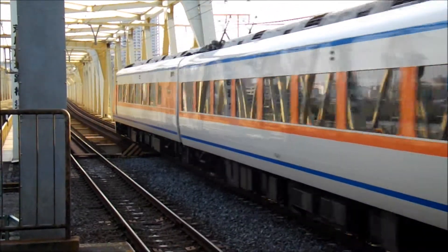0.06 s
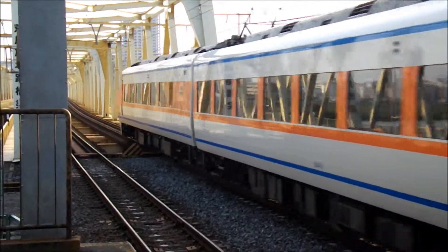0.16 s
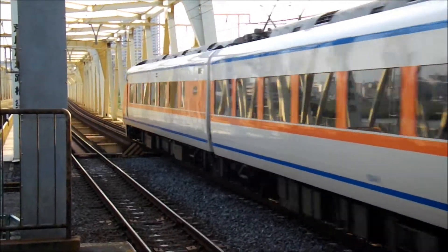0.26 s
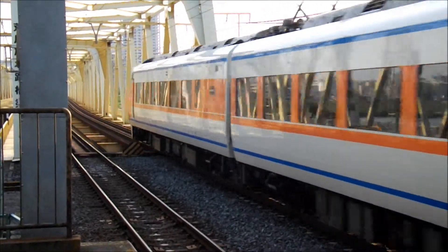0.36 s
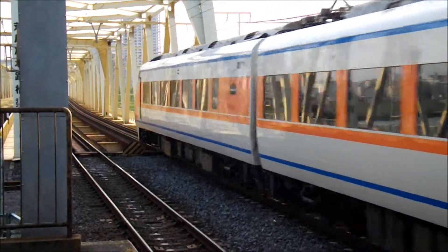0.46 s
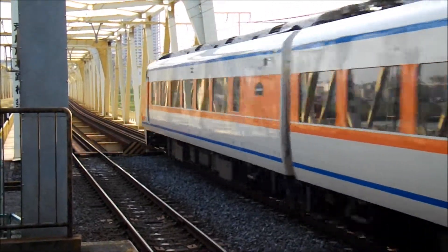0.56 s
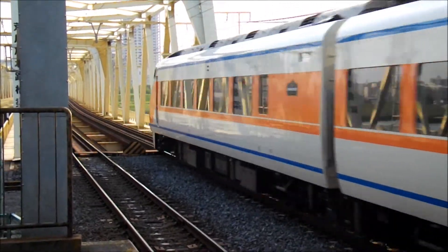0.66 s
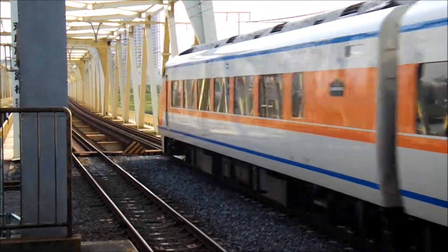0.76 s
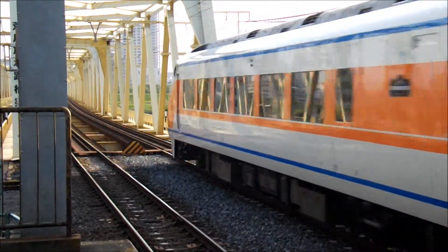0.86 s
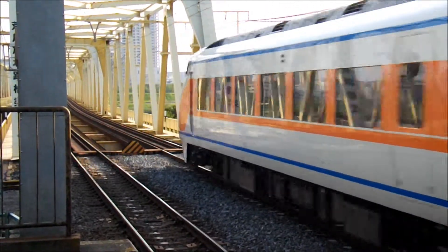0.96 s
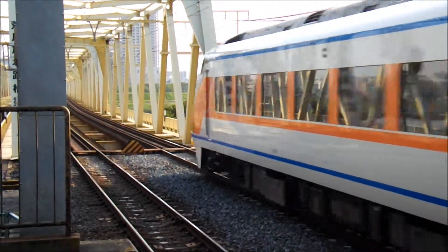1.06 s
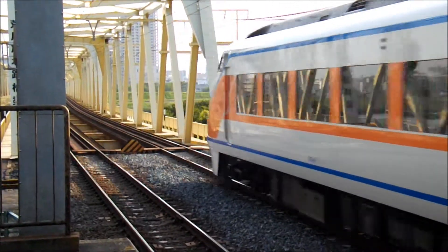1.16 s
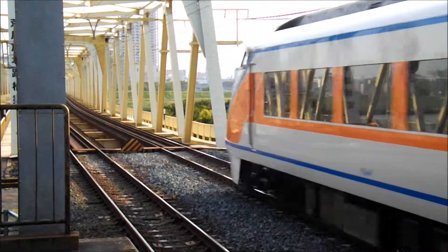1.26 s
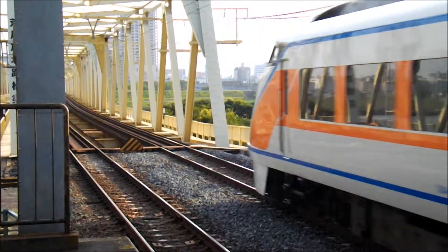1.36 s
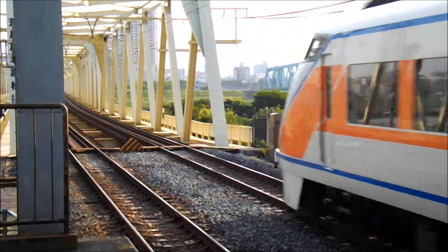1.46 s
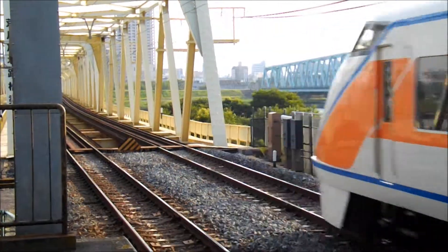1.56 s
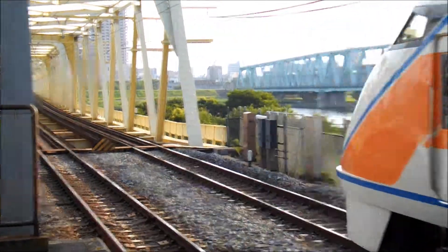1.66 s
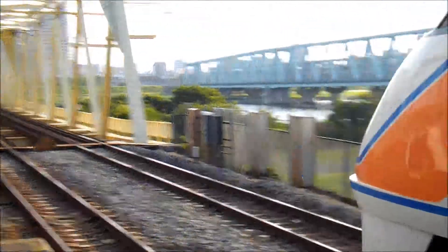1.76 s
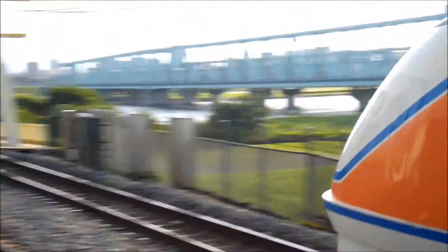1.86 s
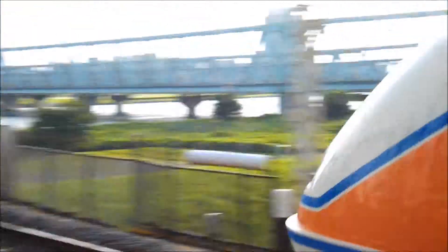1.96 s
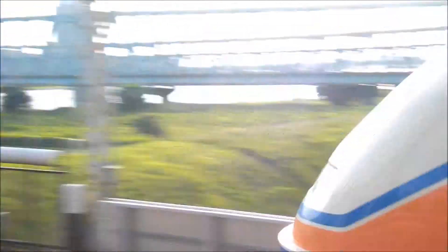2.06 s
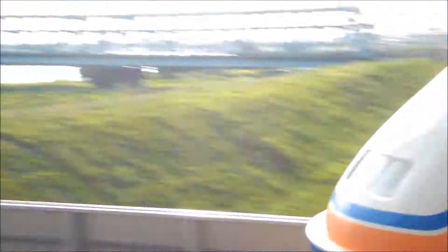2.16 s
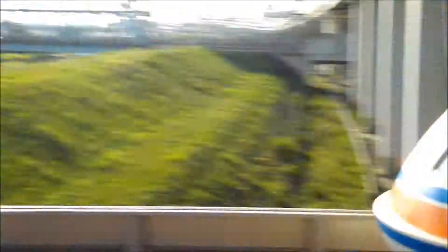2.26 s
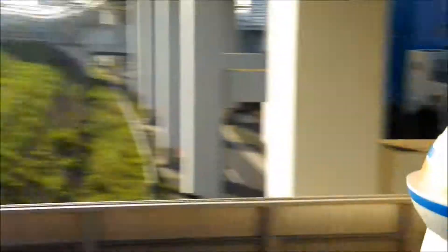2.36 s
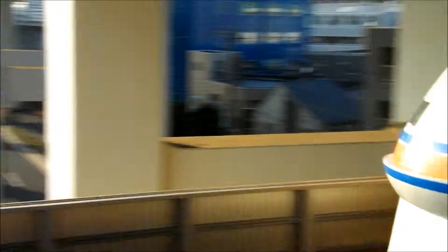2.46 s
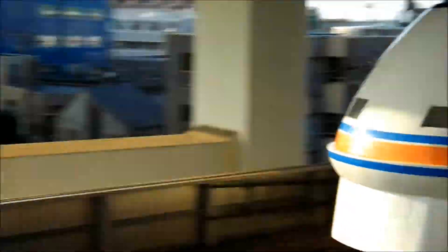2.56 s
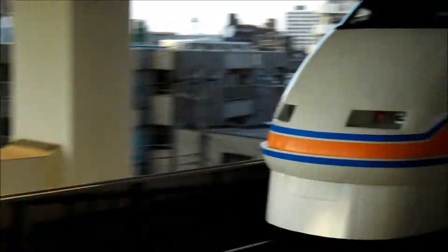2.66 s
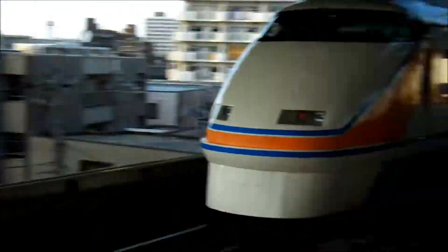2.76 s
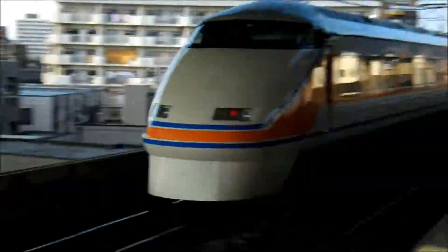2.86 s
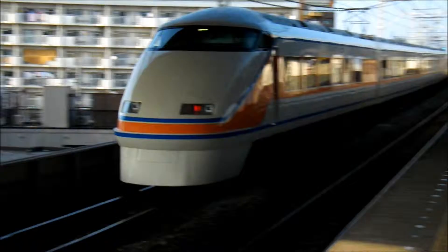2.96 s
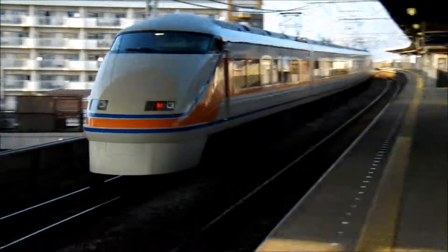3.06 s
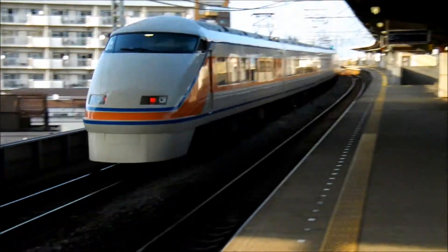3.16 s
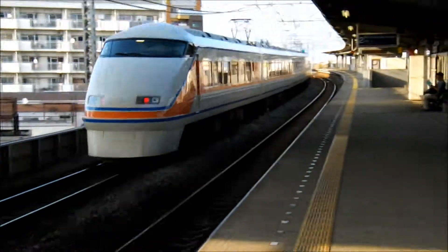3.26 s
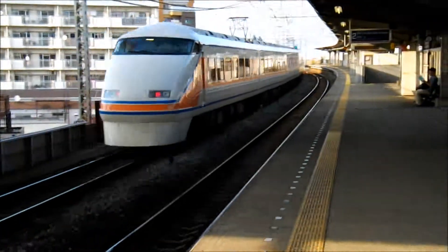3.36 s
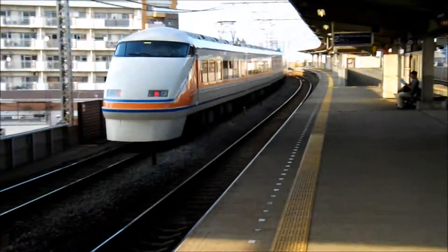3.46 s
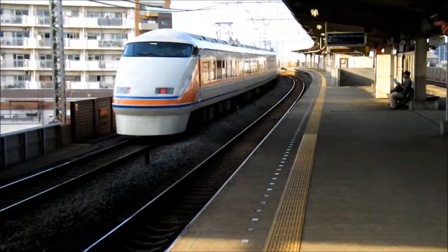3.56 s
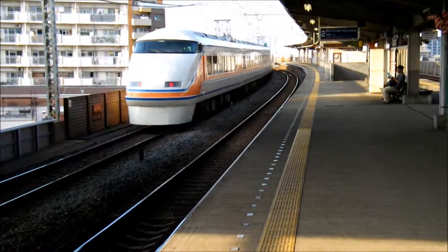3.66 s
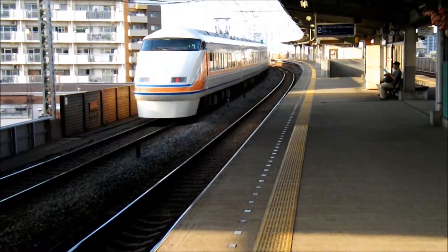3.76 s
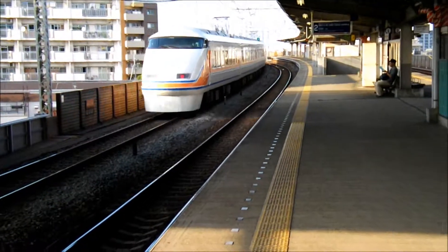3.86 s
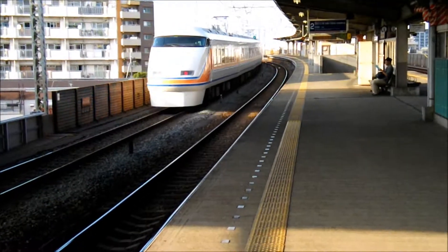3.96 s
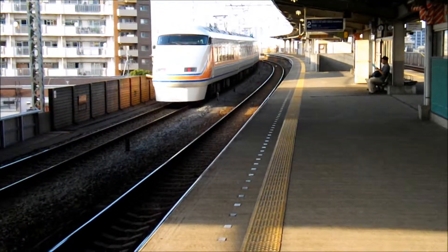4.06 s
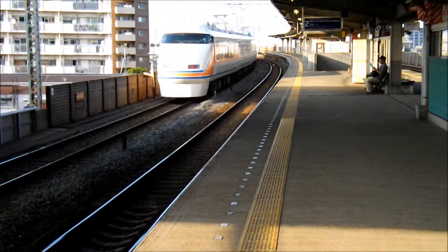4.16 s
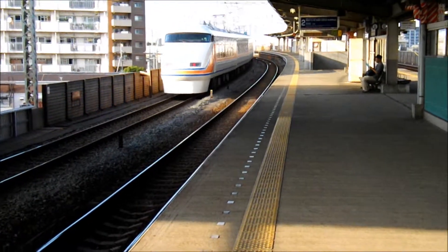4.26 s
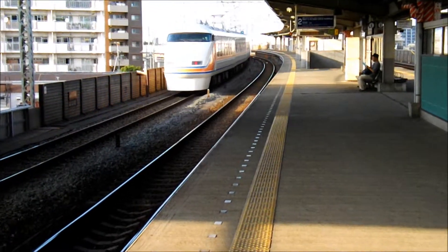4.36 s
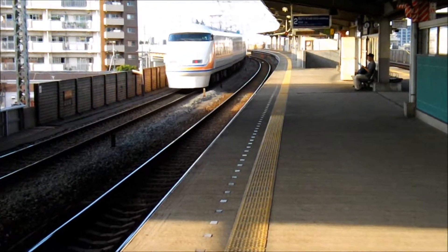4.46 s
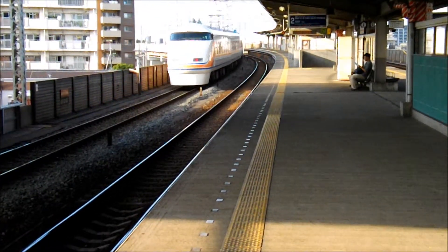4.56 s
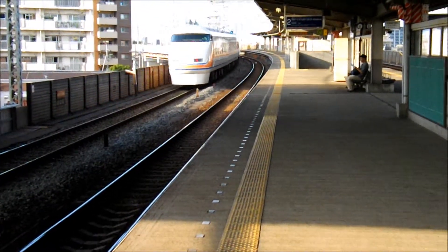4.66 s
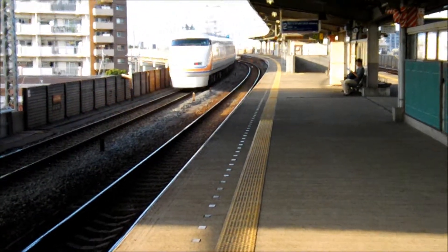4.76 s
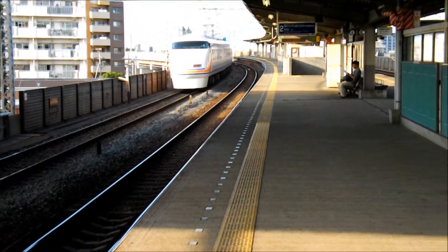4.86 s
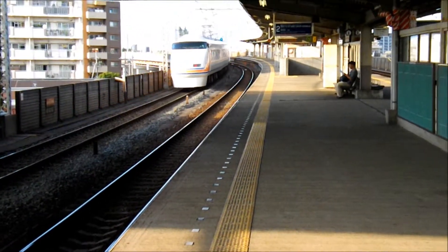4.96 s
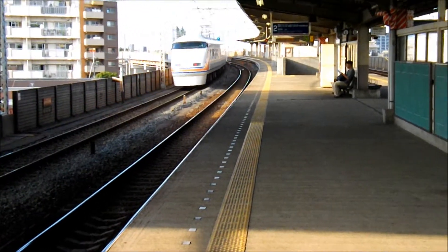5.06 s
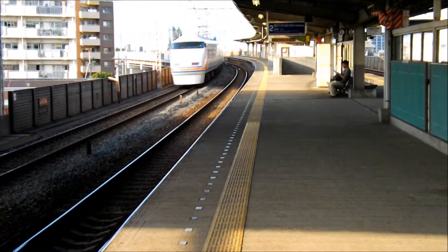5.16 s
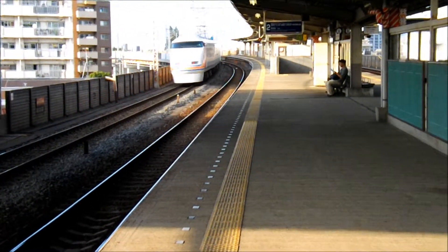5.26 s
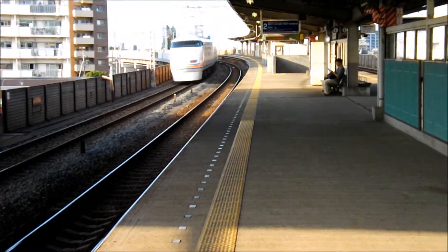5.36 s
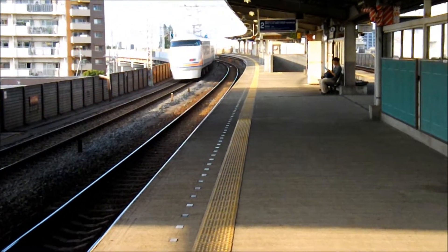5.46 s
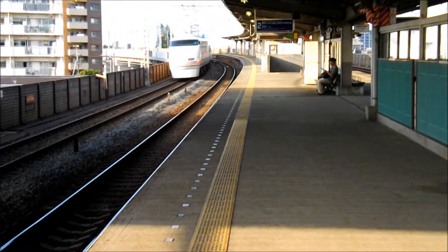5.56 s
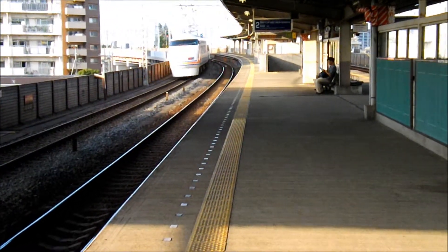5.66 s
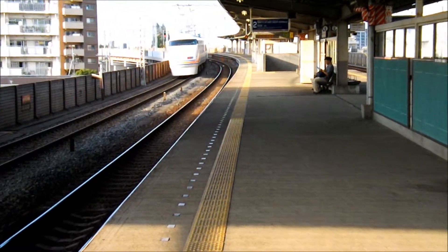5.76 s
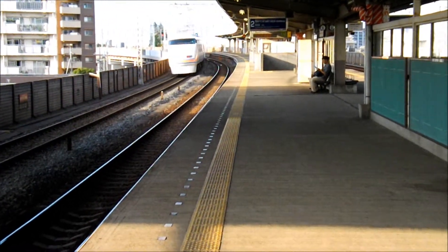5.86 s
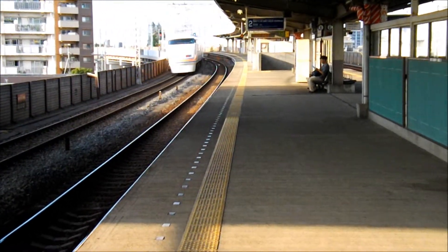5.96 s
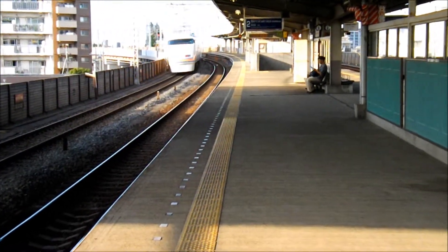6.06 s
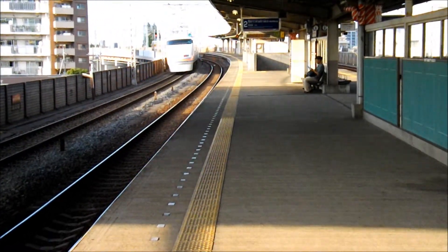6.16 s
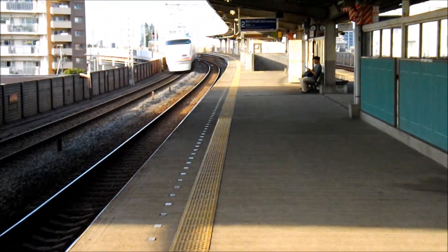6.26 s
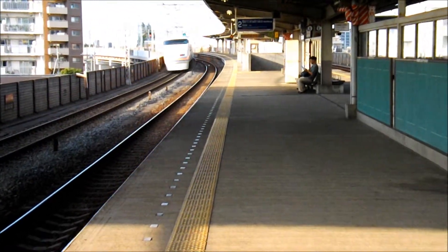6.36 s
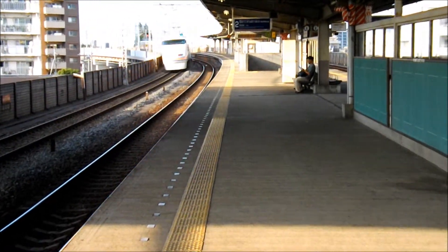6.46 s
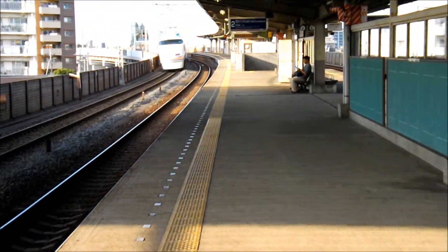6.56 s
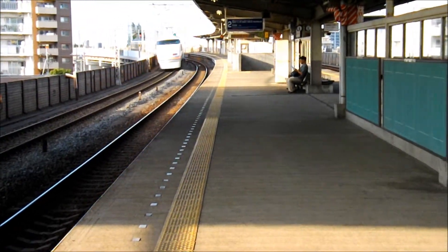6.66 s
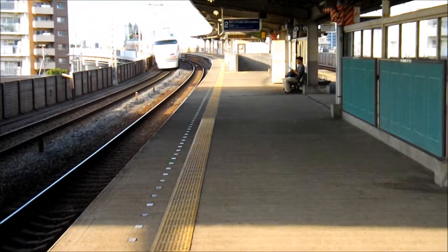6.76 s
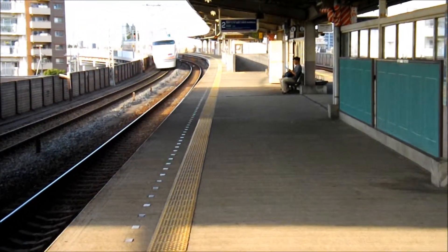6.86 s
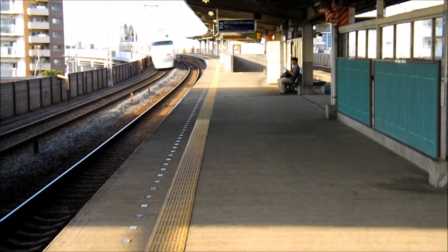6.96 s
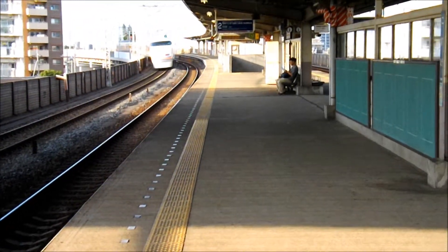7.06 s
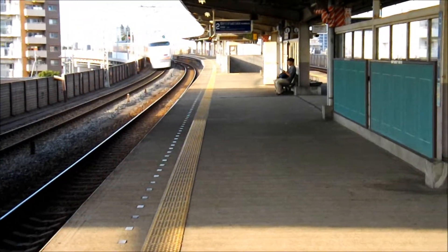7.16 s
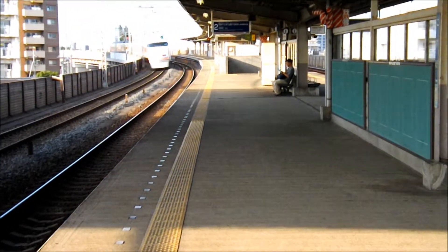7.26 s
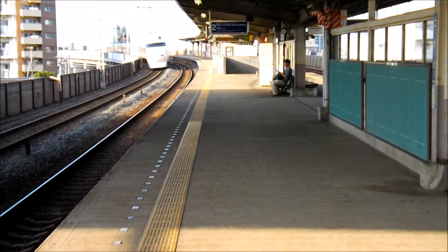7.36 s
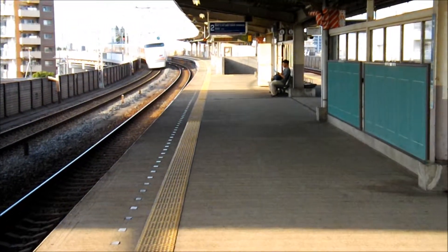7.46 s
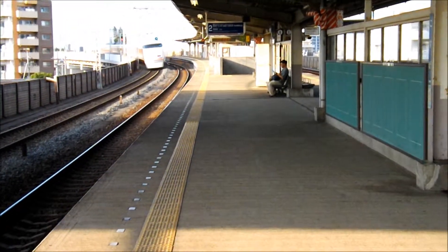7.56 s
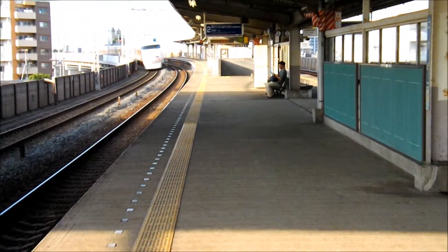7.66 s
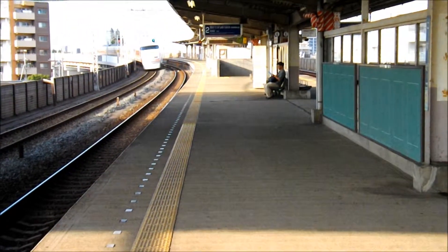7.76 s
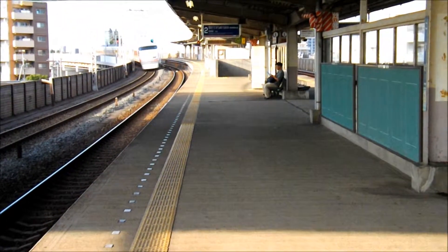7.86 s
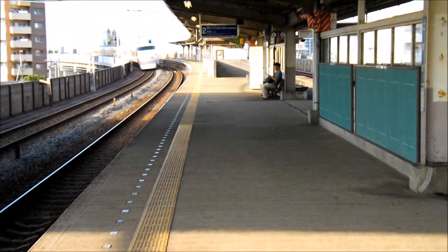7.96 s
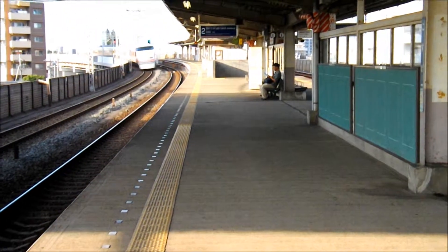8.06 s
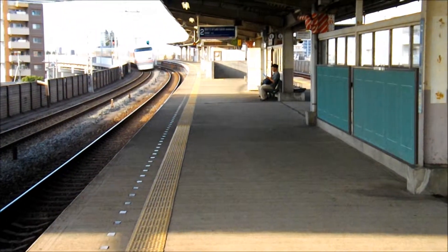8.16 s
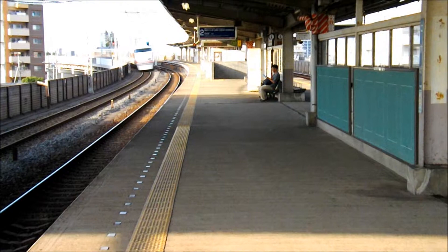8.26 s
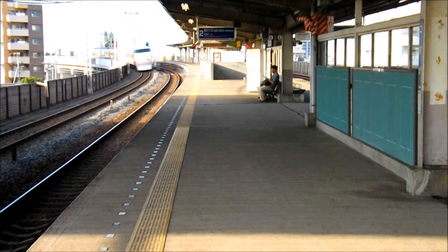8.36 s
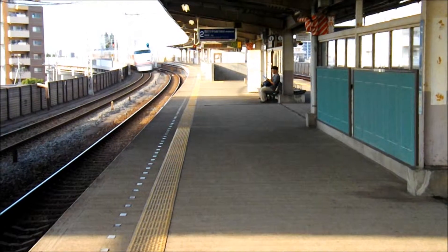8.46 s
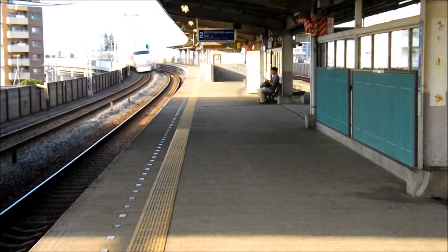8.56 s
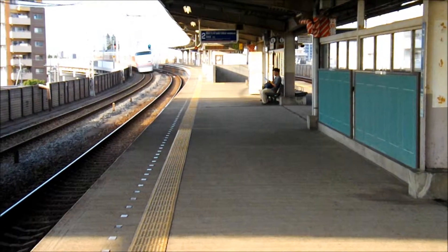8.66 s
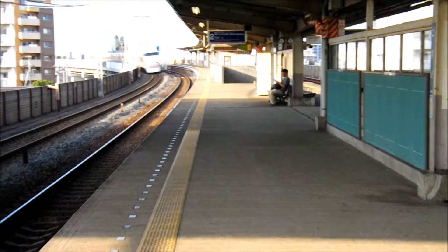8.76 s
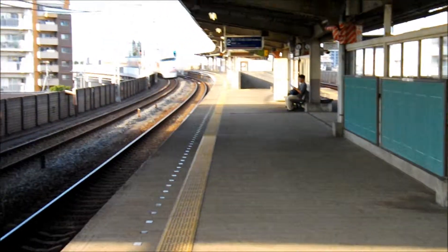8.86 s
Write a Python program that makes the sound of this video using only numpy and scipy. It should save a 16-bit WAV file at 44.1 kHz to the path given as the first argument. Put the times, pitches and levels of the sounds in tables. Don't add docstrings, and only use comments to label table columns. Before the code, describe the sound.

Loud, harsh wheel-on-rail roar sweeps by on a bridge, fades quickly, leaving faint singing rails, distant hiss and wind buffeting the microphone.

```python
import sys
import numpy as np
from scipy import signal
from scipy.fft import rfft, irfft, next_fast_len
from scipy.io import wavfile
from scipy.ndimage import uniform_filter1d, map_coordinates

SR = 44100
rng = np.random.default_rng(int(sys.argv[2]) if len(sys.argv) > 2 else 0)


def to_wav(s):
    ch = np.atleast_2d(s).T
    pcm = np.round(np.clip(ch, -1, 1) * 32767)
    wavfile.write(sys.argv[1], SR, pcm.astype(np.int16))


def decibels_to_gain(level_db):
    exponent = np.asarray(level_db, float) / 20
    return 10 ** exponent


N = 393372

# f/Hz, density level/dB
TRAIN_SPECTRUM = [(120, -48), (165, -15), (200, -8), (370, -4), (776, -0.2), (979, -3.5), (1440, -5),
                  (2800, -1.5), (4060, -1), (5250, -4.5), (5970, -15), (7540, -14), (12000, -36.5),
                  (16000, -78)]
PART_EDGES = [450, 1300, 3850, 5700]
# t/s, nearness level/dB, flange bite level/dB
PASSAGE = [(0, -0.5, 2), (.24, 1, -1), (.57, 0.5, -1.5), (.76, -1, 2.5), (.88, 0, -0.5), (.99, -0.5, 2.5),
           (1.14, -0.5, -0.5), (1.41, -1.5, -1), (1.9, 0, 1), (2, 0, -1.5), (2.54, -4, -0.5),
           (2.72, -5, 2.5), (2.88, -8, 1), (3.6, -16, 1.5), (4, -19, 1.5), (5.2, -25, 2.5), (6, -27, -1.5),
           (8.92, -28, -4.5)]
# level/dB, fading per dB of nearness, share of the bite, patchiness/dB
TRAIN_PARTS = [
    (-30.5, 1, 0.01, -0.1),
    (-24.5, 0.78, 0.01, 1.65),
    (-20, 0.91, 0.01, 1.3),
    (-20, 1.01, 1.57, 1),
    (-34, 0.93, 0.77, 1.1),
]
# middle t/s, duration/s, rise in level/dB
FLANGE_RASPS = [(.47, .15, 1), (1.07, 0.092, -0.5), (3.1, 0.35, 0), (5.95, .15, 3.5), (7.72, 0.091, 4),
                (8.14, 0.11, 6), (8.22, .06, 5), (8.33, 0.078, 7), (8.45, .1, 6), (8.62, .06, 9),
                (8.83, 0.23, 7.5)]
# middle t/s, duration/s, rise in level/dB
BOGIE_THUMPS = [(.1, .15, 0), (.5, 0.13, -0.5), (.99, .06, 1.5), (1.27, 0.48, 1.5), (1.55, 0.18, 0.5),
                (1.91, .1, 1.5), (2.17, 0.079, 0), (2.74, .1, 1.5)]
# t/s, duration/s, level/dB, f/Hz, bandwidth/Hz
FLANGE_SQUEALS = [(0, 0.084, -21, 5150, 200), (0.726, 0.12, -28.5, 6900, 700), (0.918, .09, -24, 5000, 250),
                  (1.792, 0.18, -22.5, 5150, 150), (2.434, 0.11, -27.5, 5000, 200),
                  (2.576, 0.072, -17.5, 5370, 160), (2.58, 0.049, -33, 6870, 70),
                  (2.618, 0.079, -25, 5400, 150), (5.82, 0.083, -40, 4740, 400), (7.7, .07, -44, 4950, 400),
                  (8.36, 0.065, -38, 4600, 600), (8.595, .045, -43, 4300, 700),
                  (8.787, 0.22, -42, 4900, 500)]
# t/s, duration/s, level/dB, f/Hz, bandwidth/Hz
RAIL_RINGS = [(.5, 0.14, -28, 800, 40), (0.687, 0.13, -27, 644, 50), (0.956, 0.077, -24, 1665, 40),
              (1.198, 0.12, -25.5, 780, 60), (1.445, 0.46, -31, 760, 60), (2.597, 0.11, -29, 766, 60),
              (2.986, 0.18, -41, 716, 30), (3.198, .45, -42, 606, 39.7), (3.2, .48, -43.5, 1130, 30),
              (3.749, .48, -50, 1120, 25)]
# f/Hz, density level/dB
TOWN_SPECTRUM = [(110, -15), (190, 0.5), (460, -1), (770, 0.5), (1260, -4), (1910, -7), (2280, -5),
                 (2680, -13.5), (3700, -16), (4100, -2), (5050, -1), (5600, -14.5), (6200, -20),
                 (10000, -50)]
# middle t/s, duration/s, level/dB
PORT_GUSTS = [(3.899, 0.36, -27), (4.08, 0.11, -31), (4.246, 0.27, -22.5), (4.58, 0.26, -32.5),
              (4.803, .03, -31), (4.876, .06, -30.5), (5.227, 0.051, -31), (5.46, .04, -26),
              (5.512, 0.051, -31), (5.587, .04, -34), (5.65, .04, -31.5), (5.733, 0.035, -31),
              (5.797, 0.041, -26.5), (5.895, 0.033, -26), (6.01, 0.058, -28), (6.118, 0.11, -26.5),
              (6.222, .04, -31), (6.285, 0.075, -29), (6.533, 0.14, -33), (7.005, 0.049, -29),
              (7.065, 0.019, -29), (7.329, 0.047, -33), (7.465, 0.07, -32), (7.53, 0.031, -32),
              (7.651, 0.22, -33.5), (7.95, 0.43, -36), (8.265, 0.081, -32), (8.4, 0.22, -31.5),
              (8.775, 0.34, -38.5)]
# t/s, level/dB, f/Hz
STRONG_EDDIES = [(3.82, -25, 350), (3.911, -13, 675), (3.939, -17, 635), (4.015, -19, 558),
                 (4.075, -16, 415), (4.153, -22, 552), (4.187, -11, 620), (4.232, -11, 490),
                 (4.26, -10, 443), (4.274, -10, 590), (4.296, -15, 556), (4.308, -15, 450),
                 (4.329, -15, 576), (4.795, -19.5, 541), (4.871, -24, 370), (5.454, -15, 559),
                 (5.462, -18, 476), (5.495, -17, 521), (5.519, -20, 449), (5.79, -19, 415),
                 (5.89, -20, 553), (6.007, -19.5, 526), (6.217, -19, 405.5), (6.28, -20, 490),
                 (7.462, -20, 525), (7.528, -22, 553), (8.247, -19, 719), (8.293, -20, 480),
                 (8.445, -19, 620), (8.733, -25, 485)]
# t/s, level/dB
DULL_EDDIES = [(3.849, -25), (3.901, -22), (3.95, -20), (4.209, -24), (4.248, -22), (4.351, -21),
               (4.47, -24), (4.656, -23), (4.885, -21), (5.509, -24), (5.806, -26), (5.898, -22),
               (6.105, -24), (6.128, -25), (6.148, -24), (6.209, -20), (6.269, -23), (6.512, -22.5),
               (7.007, -25), (7.066, -24), (7.322, -27), (7.639, -27), (7.661, -25), (7.841, -22),
               (7.943, -25.5), (8.112, -25), (8.261, -24), (8.326, -25), (8.372, -28), (8.403, -23)]
# f/Hz, density level/dB
FLUTTER_SPECTRUM = [(18, -53), (30, -42), (119, -2), (398, 1), (553, -11), (673, -4), (805, -6),
                    (1270, -18), (1500, -9), (1950, -46), (3300, -120)]
# f/Hz, density level/dB
BREEZE_SPECTRUM = [(20, -23), (60, -6.5), (130, -0.5), (200, -1.0), (400, -64)]
# f/Hz, density level/dB
DRONE_SPECTRUM = [(110, -32), (190, -6), (370, -2), (500, -17), (800, -60)]
# t/s, peak level/dB
BODY_TICKS = [
    (1.901, -6.5),
    (5.491, -24),
]
# f/Hz, level/dB, waver/Hz
RAIL_TONES = [
    (716, -50, 6),
    (1125, -56, 9),
]
# t/s, level/dB
RAIL_SINGING = [(2.7, -8), (3.1, 7), (3.5, -11), (3.8, 8), (4.1, -3), (4.45, 7), (4.75, -0.5), (5, -8),
                (8.9, -34)]
# t/s, depth/dB, recovery/s
GAIN_DUCKS = [(.062, 5.5, 0.012), (0.177, 3, 0.016), (.292, 4.5, 0.018), (.352, 3, 0.011), (.675, 6, 0.015),
              (.709, 5, 0.0087), (0.742, 4, 0.021), (.785, 2, 0.012), (0.823, 4, 0.014), (.877, 2, .021),
              (.893, 4, 0.01), (.942, 6.5, .024), (1.016, 2.5, .03), (1.129, 10.5, 0.017),
              (1.171, 4, 0.023), (1.223, 3, 0.023), (1.417, 3.5, 0.011), (1.598, 3, 0.0062),
              (1.652, 2.5, 0.021), (1.761, 3.5, 0.02), (1.811, 2.5, 0.033), (1.855, 2, .01),
              (1.955, 3.5, 0.034), (2.038, 5.5, 0.013), (2.201, 3, 0.012), (2.305, 6, 0.013),
              (2.397, 4, 0.0098), (2.621, 5.5, 0.015), (2.652, 3, 0.032), (4.278, 4.5, 0.014)]
# f/Hz, density level/dB
CIRCUIT_SPECTRUM = [(3530, -35), (6000, -8), (7900, -6.5), (9680, -7.5), (15000, -5), (15600, -7.5)]
# f/Hz, level/dB
SIDE_SPECTRUM = [(100, -16), (400, -12), (750, -7), (1200, -11), (1900, -3), (2600, -6)]


def unit(x):
    return x / np.sqrt(np.mean(x ** 2) + 1e-20)


def curves(rows):
    s, *cols = np.transpose(rows)
    return [np.interp(np.arange(N) / SR, s, c) for c in cols]


def wobble(rate):
    knots = rng.standard_normal(int(N * rate / SR) + 4)
    return map_coordinates(knots, [np.arange(N) * rate / SR])


def swells(rows):
    t = np.arange(0, N / SR + .002, .001)
    bells = sum(height * np.exp(-(2 * (t - s) / length) ** 2) for s, length, height in rows)
    return np.interp(np.arange(N) / SR, t, bells)


def filtered(x, response):
    m = next_fast_len(N + 8192)
    hz = np.fft.rfftfreq(m, 1 / SR) + 1e-3
    return unit(irfft(rfft(x, m) * response(hz), m)[:N])


def colour(spectrum):
    f, db = np.transpose(spectrum)
    return lambda hz: decibels_to_gain(np.interp(np.log(hz), np.log(f), db))


def patchy(patchy_db):
    z = signal.stft(rng.standard_normal(N), nperseg=512)[2]
    field = uniform_filter1d(rng.standard_normal(z.shape), size=5, axis=0)
    field = uniform_filter1d(field, size=9, axis=1)
    return signal.istft(z * decibels_to_gain(patchy_db * unit(field)), nperseg=512)[1][:N]


def train():
    edges = [1e-3, *PART_EDGES, SR]
    below = lambda hz, edge: 1 / (1 + (hz / edge) ** 12)
    jolts_db = 0.078 * wobble(24)
    near_db, bite_db = curves(PASSAGE)
    bite_db = bite_db + swells(FLANGE_RASPS)
    thump_db = swells(BOGIE_THUMPS)
    out = np.zeros(N)
    for k, (db, fades, bites, patchy_db) in enumerate(TRAIN_PARTS):
        band = lambda hz: np.sqrt(np.abs(below(hz, edges[k + 1]) - below(hz, edges[k])))
        share = lambda hz: band(hz) * colour(TRAIN_SPECTRUM)(hz)
        level_db = db + fades * near_db + bites * bite_db + jolts_db
        if k < 2:
            level_db = level_db + thump_db
        out += decibels_to_gain(level_db) * filtered(patchy(patchy_db), share)
    return out


def squeals():
    out = np.zeros(N)
    hz_axis = np.fft.rfftfreq(SR // 2, 1 / SR)
    for s, length, db, hz, width_hz in FLANGE_SQUEALS + RAIL_RINGS:
        n = round(length * SR)
        mode = 1 / (1 + ((hz_axis - hz) / width_hz) ** 2)
        rub = unit(irfft(rfft(rng.standard_normal(SR // 2)) * mode))[:n]
        swell = np.sin(np.pi * (np.arange(n) / n) ** 0.7)
        spot = out[round(s * SR):][:n]
        spot += (decibels_to_gain(db) * swell * rub)[:len(spot)]
    return out


def town():
    level_db = -39.5 + .4 * wobble(3)
    return decibels_to_gain(level_db) * filtered(patchy(patchy_db=0.03), colour(TOWN_SPECTRUM))


def slow_pressure(lingering):
    t, fall_s = np.arange(N) / SR, 0.1
    wake = decibels_to_gain(-53.5 + 1.8 * wobble(6.9))
    wake *= (1 - np.tanh((t - 3.17) / fall_s)) / 2
    wake *= 0.68 + 0.37 * np.tanh((t - 0.69) / fall_s)
    pressure = decibels_to_gain(-55) + decibels_to_gain(-20.5) * lingering + wake
    noise = filtered(rng.standard_normal(N), colour(BREEZE_SPECTRUM))
    return pressure * decibels_to_gain(0.75 * wobble(14)) * noise


def eddies(gust):
    gap_s, pitch_hz, pitch_spread = .017, 440, 0.28
    first_s = PORT_GUSTS[0][0] - PORT_GUSTS[0][1]
    slots = np.arange(first_s, N / SR - .05, gap_s)
    luck = rng.standard_normal((len(slots), 3))
    when = slots + gap_s / 4 * np.clip(luck[:, 0], -2, 2)
    size_db = 20 * np.log10(gust[(when * SR).astype(int)] + 1e-9) + 2 * luck[:, 1]
    lesser = list(zip(when, size_db, pitch_hz * np.exp(pitch_spread * luck[:, 2])))
    dull = [(s, db, 406) for s, db in DULL_EDDIES]
    shed = STRONG_EDDIES + dull + lesser
    pops, t = np.zeros(N), np.arange(-400, 400) / SR
    for (s, db, hz), (turn, cycles) in zip(shed, rng.random((len(shed), 2))):
        bell = np.exp(-(t * hz / (0.5 + 0.29 * cycles)) ** 2)
        puff = bell * np.sin(2 * np.pi * (hz * t + turn))
        puff = puff - np.hanning(len(t)) * puff.mean() * 2
        pops[round((s + t[0]) * SR):][:len(t)] += decibels_to_gain(db - 2.5) * puff
    return pops


def wind():
    lumps = decibels_to_gain(2.8 * wobble(90) + .6 * wobble(25))
    flutter = unit(lumps * filtered(rng.standard_normal(N), colour(FLUTTER_SPECTRUM)))
    gust = swells([(s, length, decibels_to_gain(db)) for s, length, db in PORT_GUSTS])
    lingering = np.sqrt(np.abs(uniform_filter1d(gust ** 2, size=round(.07 * SR))))
    drone = decibels_to_gain(-13) * lingering * filtered(patchy(patchy_db=2.5), colour(DRONE_SPECTRUM))
    return decibels_to_gain(-10.5) * gust * flutter + slow_pressure(lingering) + drone + eddies(gust)


def ticks():
    t, out = np.arange(N) / SR, np.zeros(N)
    for s, db in BODY_TICKS:
        u = np.clip(t - s, 0, None) / 0.00015
        out -= decibels_to_gain(db + 9) * u * (2 - u) * np.exp(-u)
    return out


def rails():
    out = np.zeros(N)
    for hz, db, waver_hz in RAIL_TONES:
        phase = 2 * np.pi * np.cumsum(hz + waver_hz * wobble(20)) / SR
        out += decibels_to_gain(db + 0.78 * wobble(12)) * np.sqrt(2) * np.sin(phase)
    return decibels_to_gain(curves(RAIL_SINGING)[0]) * out


def scene():
    return np.tile(train() + squeals() + town() + wind() + ticks() + rails(), (2, 1))


def treble_ceiling(x):
    hz, t, z = signal.stft(x, SR, nperseg=2048)
    loud_db = 10 * np.log10(2 * np.sum(np.abs(z) ** 2, axis=0) + 1e-12)
    luck_db = 1.8 * rng.standard_normal(len(t))
    top_hz = 15800 - 430 * np.clip(loud_db + 20.6 + luck_db, 0, None)
    ragged = rng.standard_normal((len(hz) // 16 + 1, len(t)))
    ragged = np.repeat(ragged, 16, axis=0)[:len(hz)]
    kept = hz[:, None] < top_hz + .5 * (15800 - top_hz) * ragged
    return signal.istft(z * kept, SR, nperseg=2048)[1][:N]


def gain_ducking():
    since, duck_db = np.arange(SR // 2) / SR, np.zeros(N)
    for s, depth_db, recovery_s in GAIN_DUCKS:
        back = np.exp(-(since / recovery_s) ** 1.6) + 0.069 * np.exp(-since / 0.073)
        onset = 1 - np.exp(-since / .001)
        duck_db[round(s * SR):][:len(since)] -= 1.5 * depth_db * onset * back
    return decibels_to_gain(duck_db)


def roll_off(x):
    return signal.sosfilt(signal.butter(12, 15770, fs=SR, output="sos"), x)


def record(dry):
    hiss = decibels_to_gain(-54) * filtered(rng.standard_normal(N), colour(CIRCUIT_SPECTRUM))
    mono = treble_ceiling(dry[0] * gain_ducking() + hiss)
    late = np.roll(mono, 1)
    mid, side = (late + mono) / 2, (late - mono) / 2
    side = np.std(side) * filtered(side, colour(SIDE_SPECTRUM))
    return roll_off(np.array([mid + side, mid - side]))


dry = scene()
out = record(dry)
to_wav(out)
```